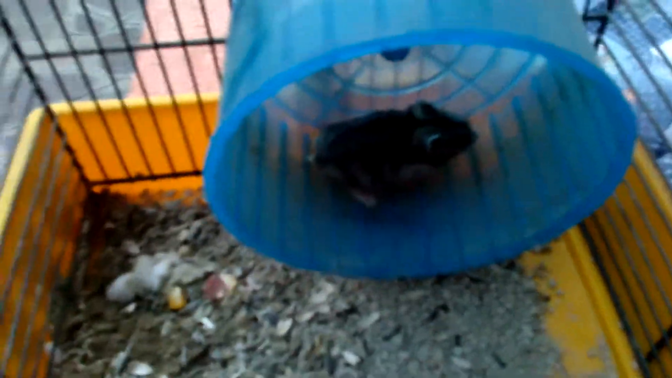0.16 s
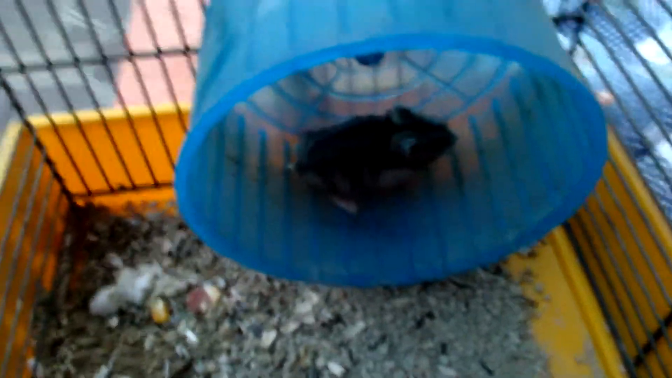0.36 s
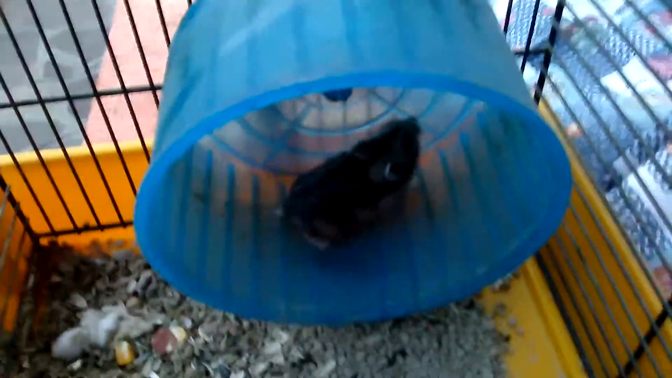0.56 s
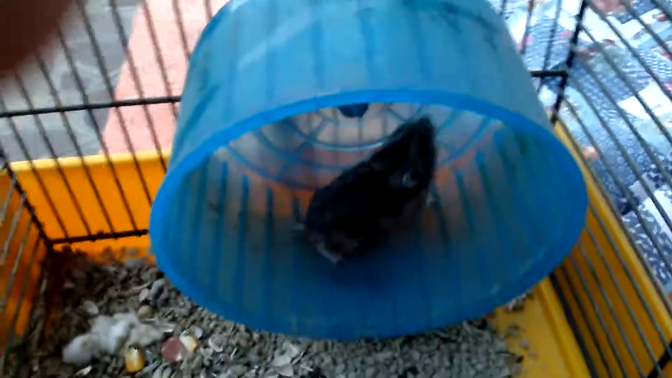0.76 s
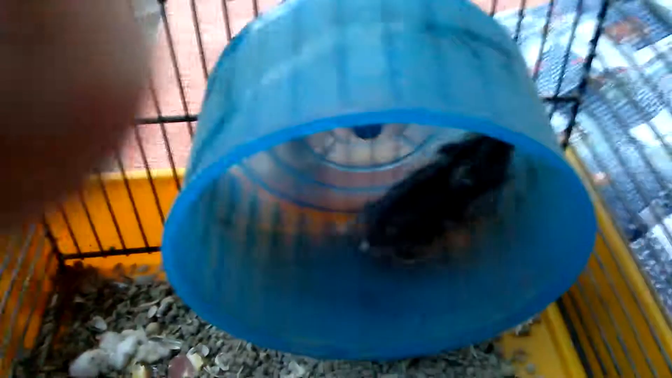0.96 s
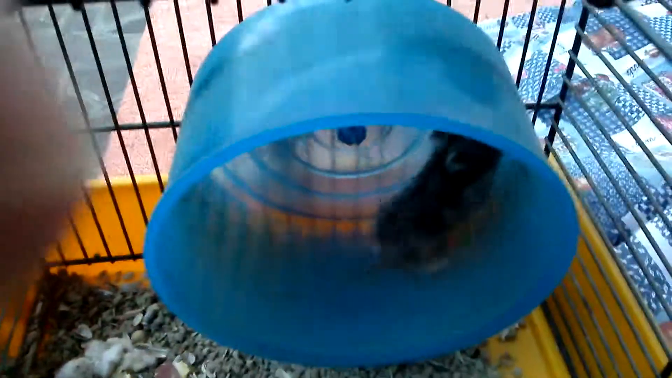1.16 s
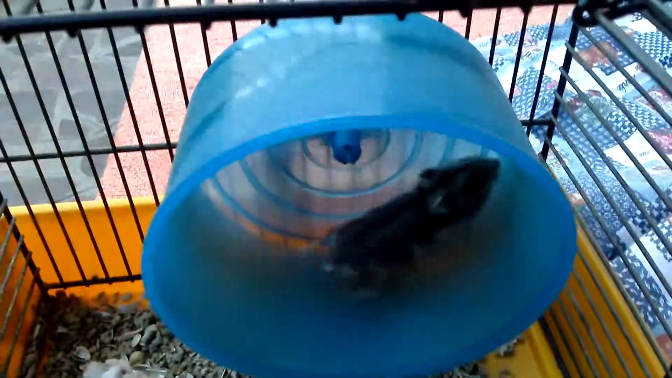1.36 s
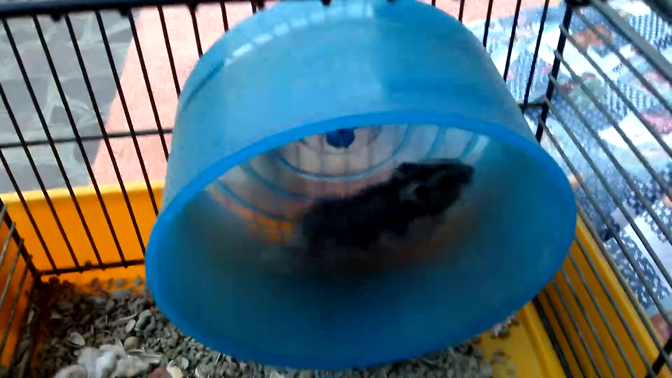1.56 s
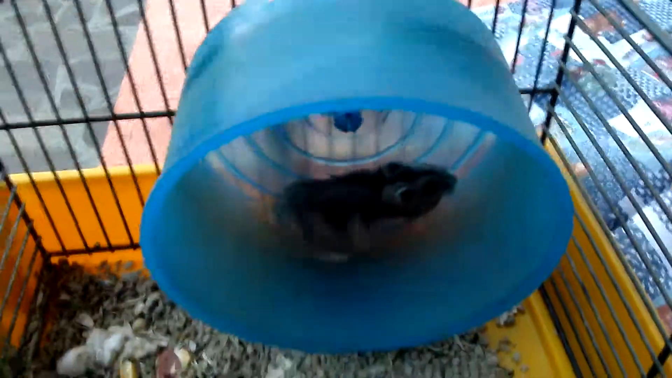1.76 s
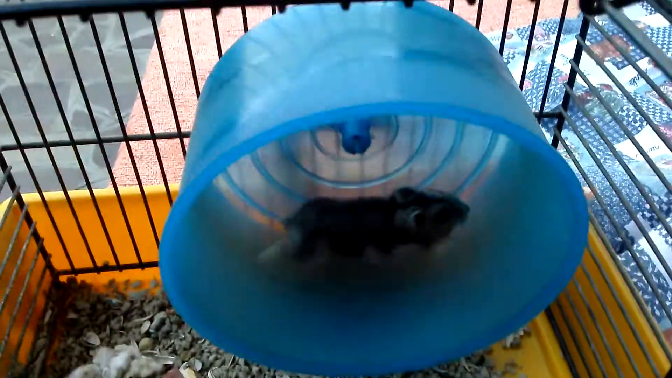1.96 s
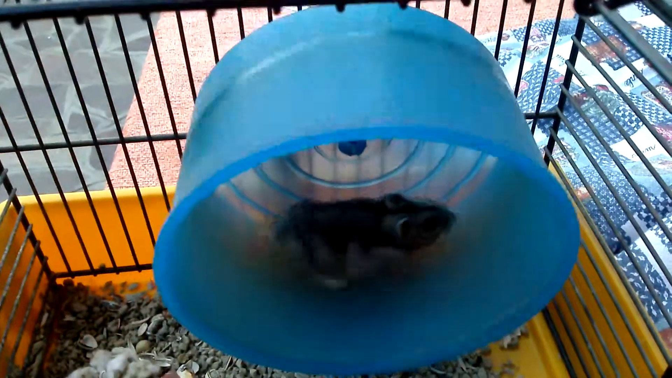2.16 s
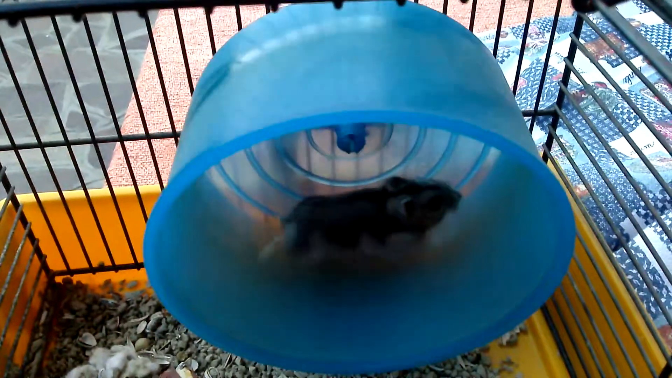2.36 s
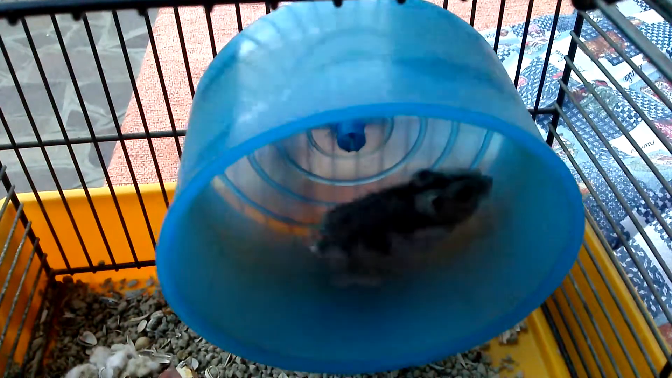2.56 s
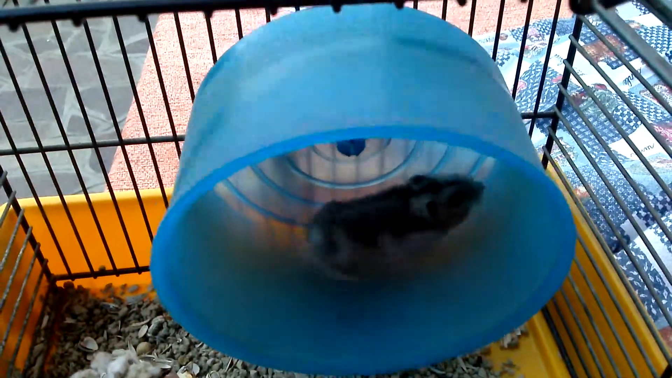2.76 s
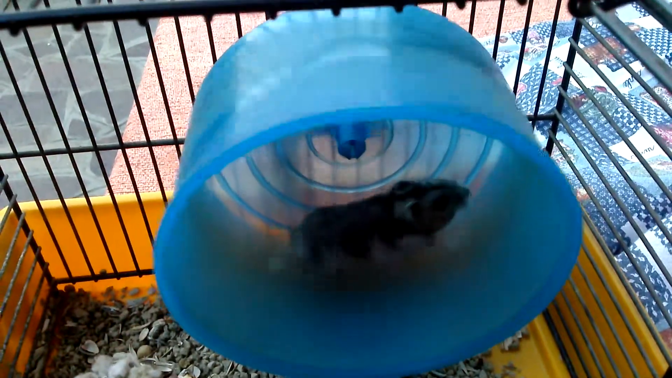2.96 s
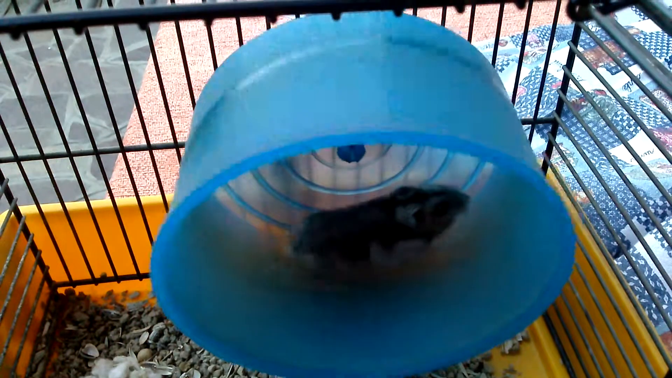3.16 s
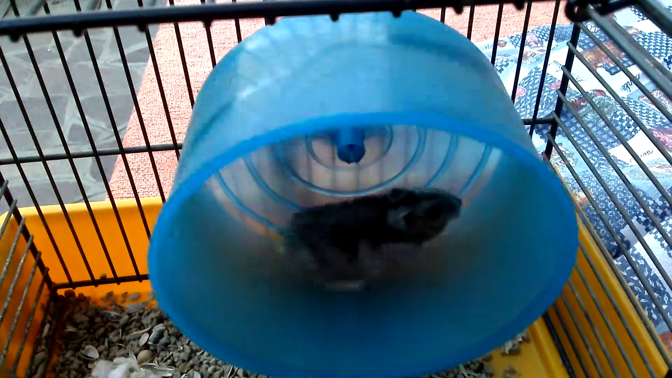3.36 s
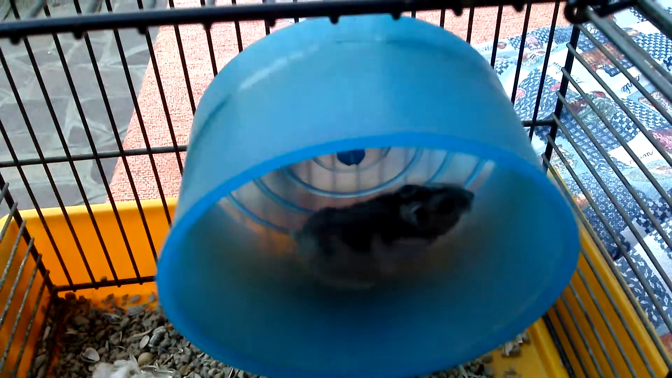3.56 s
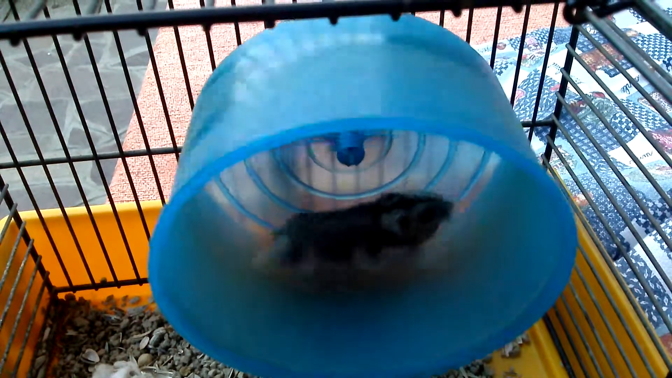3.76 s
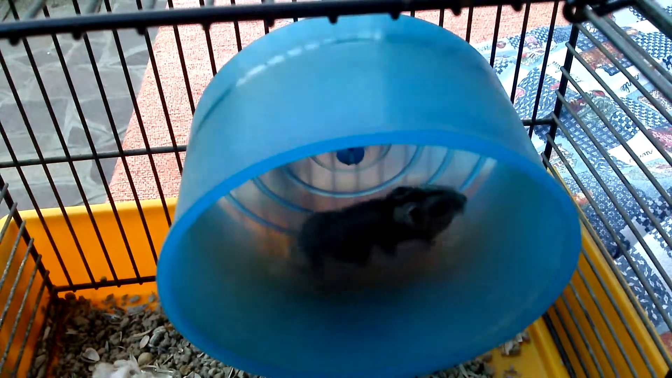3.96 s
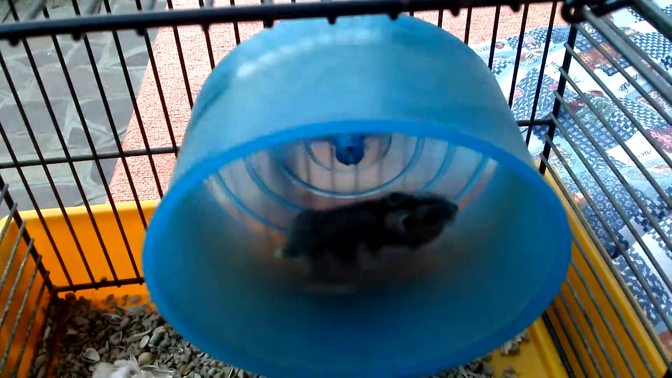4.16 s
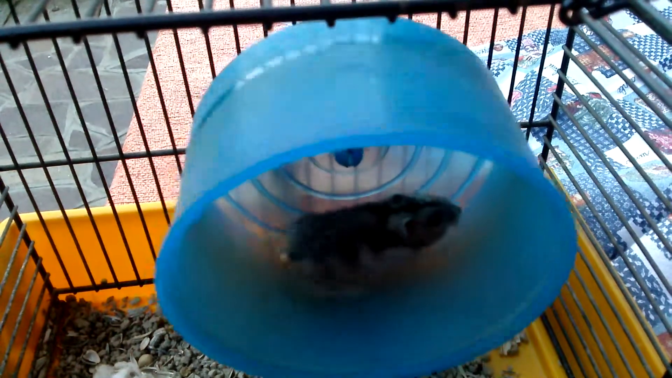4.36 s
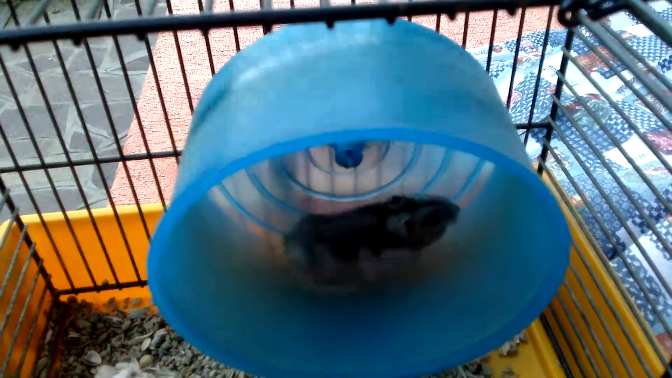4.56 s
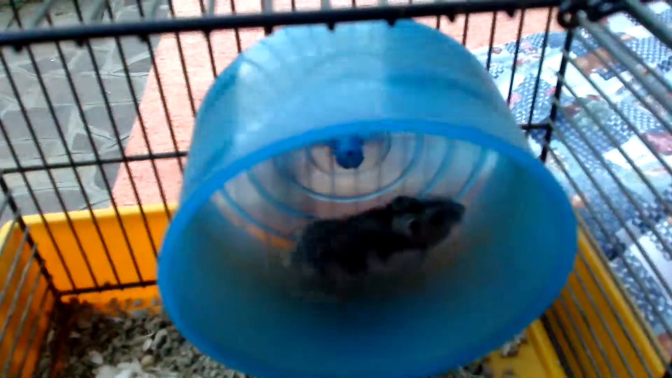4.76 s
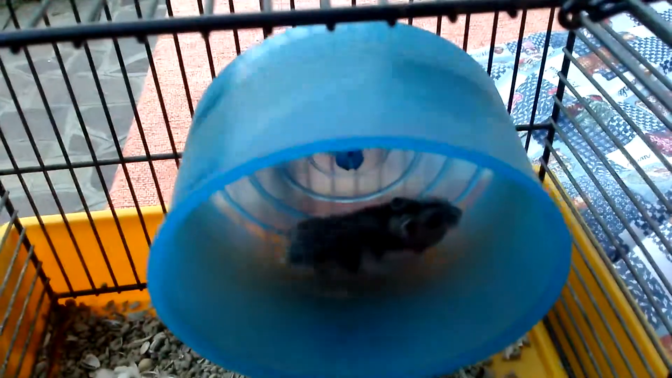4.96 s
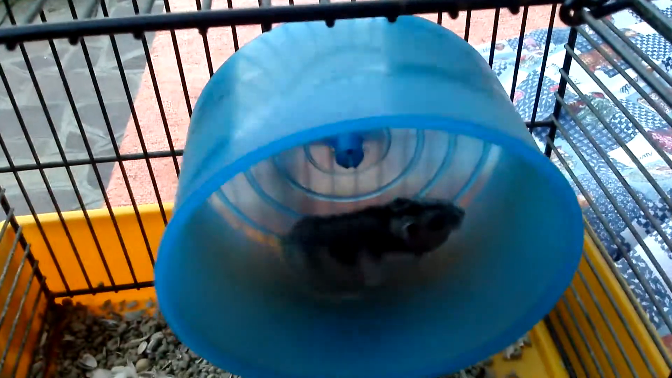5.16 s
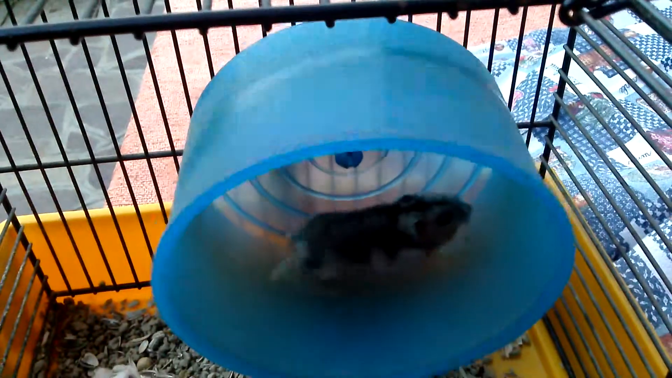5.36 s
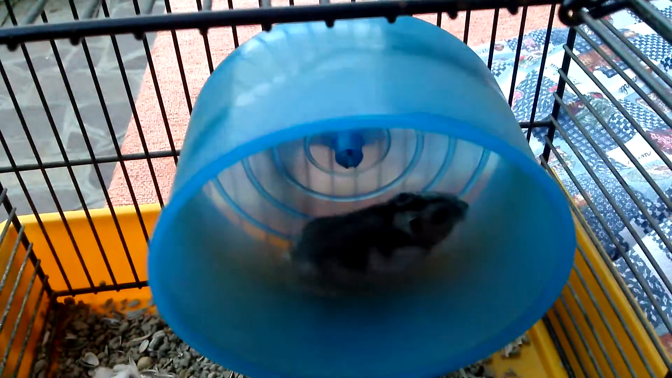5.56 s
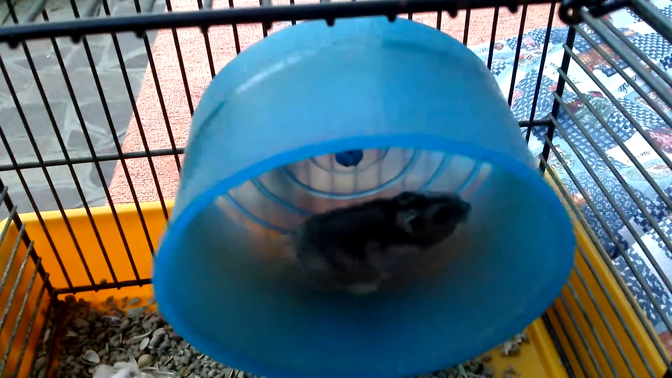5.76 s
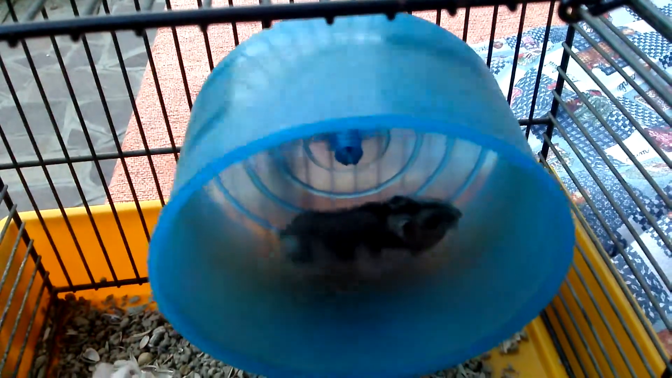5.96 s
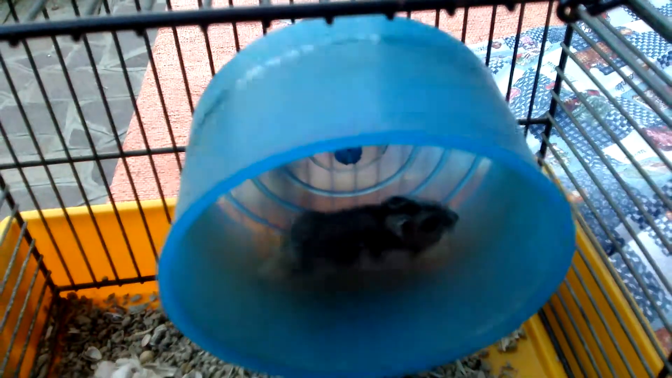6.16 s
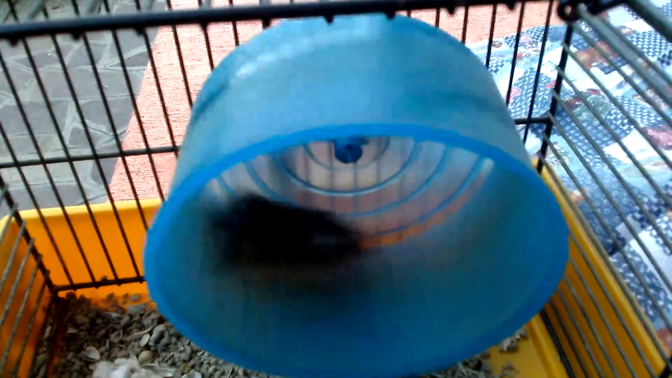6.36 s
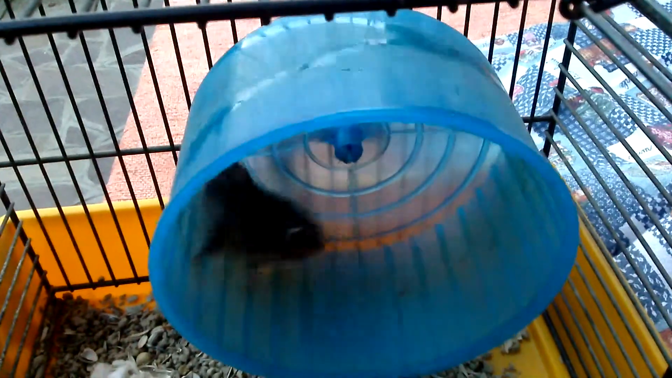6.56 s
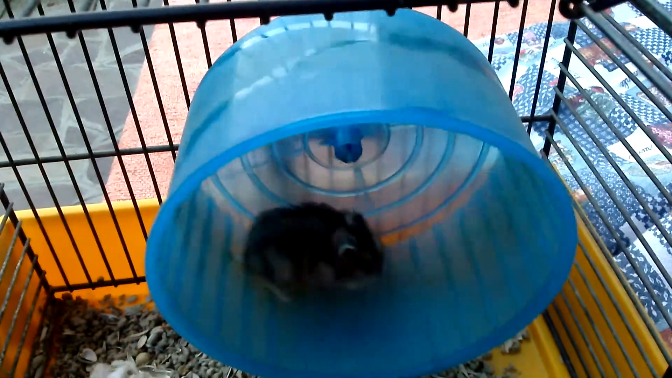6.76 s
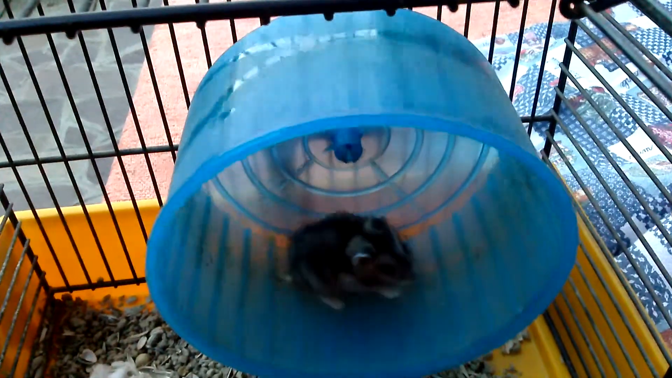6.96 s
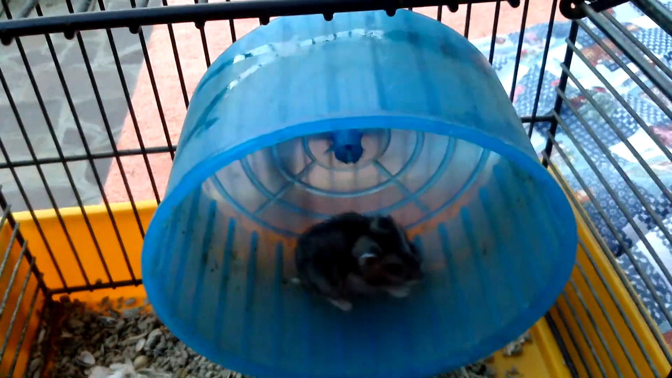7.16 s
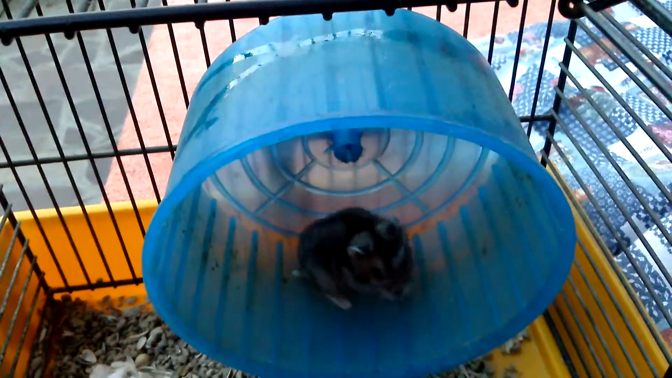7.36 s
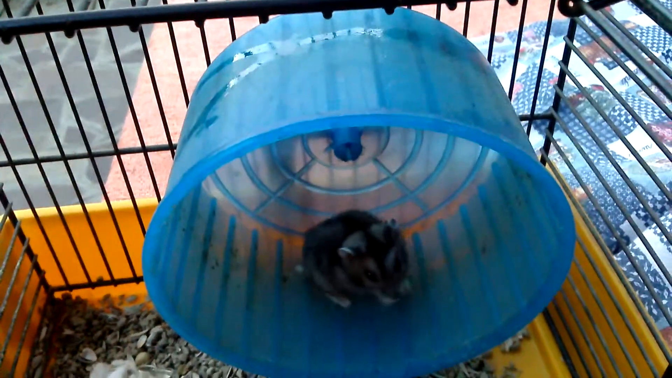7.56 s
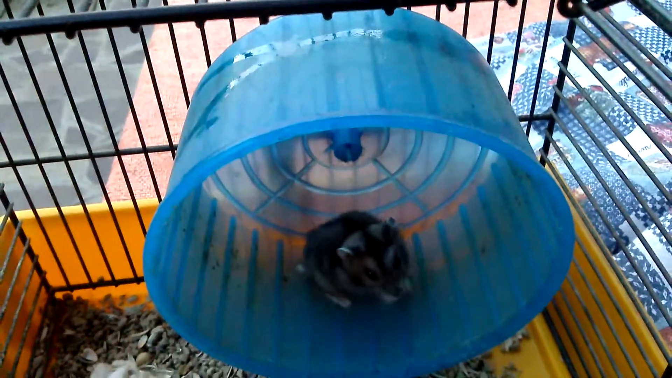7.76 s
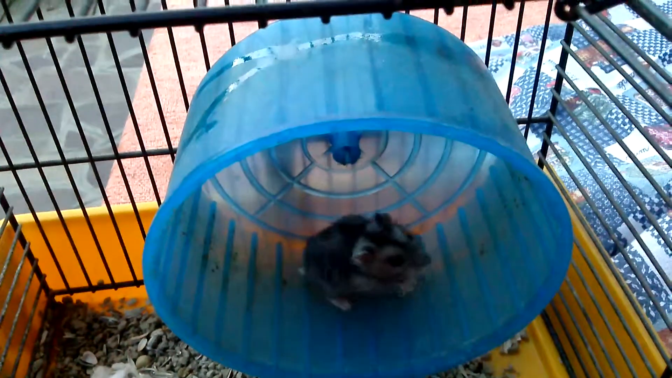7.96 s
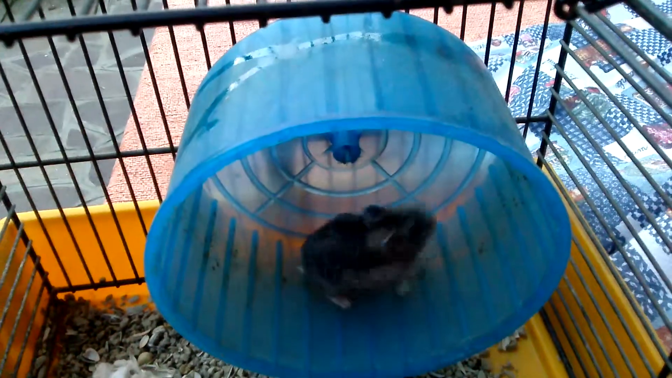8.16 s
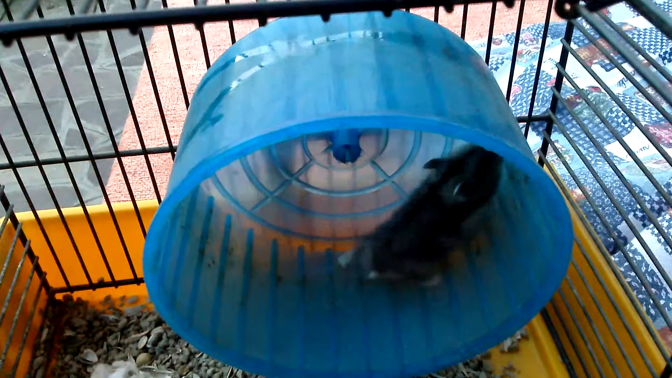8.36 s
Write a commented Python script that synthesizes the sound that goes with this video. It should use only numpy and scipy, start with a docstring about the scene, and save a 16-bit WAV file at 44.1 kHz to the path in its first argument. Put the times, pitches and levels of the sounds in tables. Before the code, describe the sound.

A quiet room with low rumble, soft hiss and a dull hum that swells and fades. From 0 to 1.5 s a finger rubs the recorder's case very close: short raspy, airy scuffs, with a sharp loud snap at 0.43 s, harsher rubbing and several ringing snaps from 0.9 to 1.0 s, and a heavy dull push near 1.15 s. Weak clicks trail off by 1.8 s. From about 1.6 s a small rodent gallops in a ribbed plastic wheel, far quieter: seven or eight scratchy strides a second, a dry whirr, light claw patter and thin axle squeaks, clearest around 5.2 s. Occasional tiny very high ticks appear. At 6.5 to 6.75 s claw taps bunch together as the wheel slows. It rests near 7 s with two soft shuffles, at 7.0 and 7.2 s. Then only faint room noise and a few very high ticks remain until 8.4 s.

```python
"""A small rodent runs in a plastic wheel in a quiet room, close to a hand-held recorder. Rumble, hiss and
swelling low tones lie under it all. First a finger rubs the recorder's case, as coloured friction noise, with
dull pushes and struck, ringing snaps. Then the wheel whirrs: each stride scrapes the ribbed drum as friction
noise through resonances, the axle squeaks and claws tick as short pings, a few with a sharp crack. After about
seven seconds the wheel comes to rest, with two soft shuffles and a few last very high ticks."""
import sys
import numpy as np
from scipy import signal
from scipy.fft import rfft, irfft
from scipy.io import wavfile
from scipy.ndimage import uniform_filter1d

SR = 44100
rng = np.random.default_rng(int(sys.argv[2]) if len(sys.argv) > 2 else 0)


def magnitude_from_level(level_db):
    """Linear magnitude for a level in decibels (20 dB per decade)."""
    exponent = np.asarray(level_db, float) / 20
    return 10 ** exponent


def materialize(psi):
    """Save the field psi as 16-bit PCM at rate SR to the path in sys.argv[1].

    A 1-D psi becomes a single channel; in a 2-D psi each row is a channel.
    """
    bounded = np.clip(np.atleast_2d(psi).T, -1, 1)
    quanta = np.round(bounded * 32767).astype(np.int16)
    wavfile.write(sys.argv[1], SR, quanta)


N = 370881  # length in samples


def read(points, hz):
    """Spectrum value on a log-frequency axis."""
    f, value = np.transpose(points)
    return np.interp(np.log(hz + 1), np.log(f + 1), value)


def evened(x):
    """Scales to rms 1."""
    return x / np.sqrt(np.mean(x ** 2) + 1e-20)


def colour(x, points):
    """Filters by a spectrum in dB, result at rms 1."""
    gain = magnitude_from_level(read(points, np.fft.rfftfreq(len(x), 1 / SR)))
    return evened(irfft(rfft(x) * gain, len(x)))


def resonate(x, hz, width):
    """Shifts hz down to zero, smooths, shifts back: a resonance of gain 1."""
    turn = np.exp(2j * np.pi * np.cumsum(hz * np.ones(len(x))) / SR)
    r = np.exp(-np.pi * width / SR)
    return 2 * (turn * signal.lfilter([1 - r], [1, -r], x / turn)).real


def fuzz(hz, width):
    """Noise through the same resonance twice: a blurred tone at rms 1."""
    once = resonate(rng.standard_normal(N), hz, width)
    return evened(resonate(once, hz, width))


def wander(per_s):
    """Slow chance, rms 1: straight lines between per_s random values a second, lightly smoothed."""
    steps = rng.standard_normal(round(per_s * N / SR) + 2)
    line = np.interp(np.linspace(0, len(steps) - 1, N), np.arange(len(steps)), steps)
    return evened(uniform_filter1d(line, size=100))


def grit(per_s, spread_db):
    """Friction: a dense train of tiny slips of uneven size."""
    slips = (rng.random(N) < per_s / SR) * rng.standard_normal(N)
    return slips * magnitude_from_level(spread_db * np.minimum(rng.exponential(1, N), 4))


def ping(hz, t60, phase=0.):
    """A mode struck once, falling 60 dB in t60 seconds."""
    t = np.arange(1200) / SR
    return np.sin(2 * np.pi * hz * t + phase) * magnitude_from_level(-60 * t / t60)


def curve(rows, column, off=-120.):
    """One column of a table along the whole time axis, at off outside the table."""
    rows = np.array(rows)
    return np.interp(np.arange(N) / SR, rows[:, 0], rows[:, column], off, off)


def add(mix, s, sound):
    """Mixes a short sound in at time s."""
    part = mix[round(s * SR):][:len(sound)]
    part += sound[:len(part)]


# Colour of room rumble and microphone hiss. Each row: frequency in Hz, relative level in dB.
ROOM_COLOUR = [(15, -61), (28, -0.5), (60, 3), (125, -5.5), (165, -14), (200, -15.5), (350, -18.5),
               (900, -27), (1400, -30.5), (2400, -38), (5000, -39.5), (9000, -39), (14700, -36),
               (16500, -33)]
# Low tones that swell and fade. Each row: time in seconds, drone level in dB, moan level in dB.
LOW_SWELLS = [(0, -55, -61), (.25, -56, -56), (1.5, -60, -78), (2.2, -50.5, -66.5), (2.8, -60, -66),
              (3.6, -51, -67), (4.2, -60.5, -65), (4.8, -48.5, -59.5), (5.7, -53, -61.5), (6.3, -52, -55),
              (6.9, -60.5, -76), (7.3, -90, -104), (8.41, -69.5, -78)]
ROOM_DB = -45  # rms of rumble and hiss together


def room():
    """Steady hiss and rumble as shaped noise, with a drone and a faint moan of blurred tones that come and go."""
    base = magnitude_from_level(ROOM_DB) * colour(rng.standard_normal(N), ROOM_COLOUR)
    drone = magnitude_from_level(curve(LOW_SWELLS, 1)) * fuzz(139.3, 18.2)
    moan = magnitude_from_level(curve(LOW_SWELLS, 2)) * fuzz(350, 130)
    return base + drone + moan


# Rubs of the finger on the case. Each row: start in seconds, length in seconds, rasp level at the start in dB,
# rasp level at the end in dB, airy hiss in dB relative to the rasp.
RUBS = [(0, 0.055, -52, -58, -33), (0.047, 0.046, -52, -43, -51), (0.108, 0.053, -70, -65, 7.5),
        (0.156, 0.037, -46, -48.5, -12), (0.198, 0.12, -45.5, -55.5, -18), (0.32, 0.14, -60, -46, -15),
        (0.477, 0.057, -48, -60, 0), (0.547, 0.1, -60.5, -44.5, -0.5), (.645, 0.15, -42, -45, 4.5),
        (0.765, 0.14, -44.5, -43.5, 10.5), (0.872, 0.082, -38.5, -27, -14.5), (0.969, 0.072, -29, -34, -3),
        (1.049, 0.01, -36, -43, -10), (1.074, .062, -37, -35.5, 1.5), (1.132, 0.024, -31.5, -21, -3),
        (1.154, 0.059, -28.5, -29, -6.5), (1.231, 0.077, -38, -37.5, -11.5),
        (1.318, 0.033, -38, -32.5, -7.5), (1.352, 0.059, -30.5, -41, -13), (1.441, 0.052, -45, -45.5, -11)]
RUB_ATTACK_S, RUB_RELEASE_S = 0.0097, 0.018  # the release is the time for a fall of 10 dB
RUB_FLOOR_DB = -60.5  # light contact remains between rubs


def rubbing():
    """Rasp and airy hiss levels in dB: each rub starts fast, drifts in level and lets go."""
    rasp, airy = np.zeros(N), np.zeros(N)  # powers
    for s, length, start_db, end_db, airy_db in RUBS:
        t = np.arange(0, length + 8 * RUB_RELEASE_S, 1 / SR)
        drift = magnitude_from_level(2 * np.interp(t, [0, length], [start_db, end_db]))
        attack = np.minimum(t / RUB_ATTACK_S, 1) ** 2
        release = magnitude_from_level(-20 * np.maximum(t - length, 0) / RUB_RELEASE_S)
        power = drift * attack * release
        add(rasp, s, power)
        add(airy, s, power * magnitude_from_level(2 * airy_db))
    held = np.arange(N) / SR < GRIP[-1][0]
    rasp = rasp + held * magnitude_from_level(2 * RUB_FLOOR_DB)
    return 10 * np.log10(rasp + 1e-12), 10 * np.log10(airy + 1e-12)


# Rasp colour of the case. Each row: frequency in Hz, relative level in dB.
CASE_COLOUR = [(880, -17), (1500, -10), (2340, 3.5), (3950, 0), (4900, -1), (5440, -29), (6000, -43),
               (7800, -54), (13200, -120)]
# Airy hiss of skin. Each row: frequency in Hz, relative level in dB.
AIRY_COLOUR = [(7000, -18.5), (9200, -0.5), (11000, 3), (13000, 5), (15700, 1.5), (16200, -70)]
# The grip. Each row: time in seconds, centre of the contact resonance in Hz,
# low knock in dB before its share of the rasp level is added.
GRIP = [(0, 2390, -30), (.2, 2400, -25.5), (.45, 2740, -25.5), (.7, 3340, -43), (.9, 3050, -50),
        (1.03, 4000, -40), (1.1, 2920, -54), (1.3, 3530, -47), (1.52, 2850, -37)]
# A thin whistle while the grip shifts. Each row: time in seconds, middle level in dB.
WHISTLE = [(0, -65), (.1, -66), (.14, -72), (.21, -62), (.33, -66), (.56, -65)]
FINE_DB, FINE_SHARE = -7, 0.27  # the fine hiss lies between rasp and airy hiss; offset, then share of the airy
KNOCK_SHARE = 0.5  # the low knock follows the rasp only in part


def finger():
    """Skin slips excite the case; the contact resonance moves with the finger."""
    slips = grit(25000, 0.54)
    body = colour(slips, CASE_COLOUR)
    contact_hz = curve(GRIP, 1, GRIP[-1][1]) * (1 + 0.12 * wander(58.8))
    catch = magnitude_from_level(1.8 * wander(300))  # the skin catches and lets go
    rasp = evened(catch * (body + 2.5 * resonate(body, contact_hz, 1000)))
    knock = colour(slips, [(250, -8.0), (500, -5), (1000, -3.5), (1700, -0.5), (2300, -30.0)])
    fine = colour(slips, [(4500, -5.5), (5600, 4), (7000, -0.5), (9000, -2), (10500, -11.5)])
    airy = colour(slips, AIRY_COLOUR)
    rasp_db, airy_db = rubbing()
    knock_db = curve(GRIP, 2) + KNOCK_SHARE * rasp_db
    fine_db = FINE_DB + (1 - FINE_SHARE) * rasp_db + FINE_SHARE * airy_db
    whistle = magnitude_from_level(curve(WHISTLE, 1) + 2.5 * wander(42)) * fuzz(6770, 200)
    return magnitude_from_level(rasp_db) * rasp + magnitude_from_level(knock_db) * knock + magnitude_from_level(fine_db) * fine + magnitude_from_level(airy_db) * airy + whistle


# Dull pushes on the case. Each row: start in seconds, level in dB, time constant in seconds.
PUSHES = [(0.212, -27.5, 0.0027), (0.239, -27, 0.0028), (0.888, -36, 0.0017), (0.973, -35, 0.0021),
          (1.08, -65, 0.0034), (1.155, -13, 0.0027)]


def pushes():
    """Dull pushes on the capsule: the pressure dips, then swings back."""
    out = np.zeros(N)
    for s, db, length in PUSHES:
        u = np.arange(4000) / SR / length
        add(out, s, -magnitude_from_level(db) * np.e * u * np.exp(-u) * np.cos(1.48 * u))
    return out


# Snaps and sharp ticks. Each row: start in seconds, level in dB, ring in Hz, # treble crack in dB relative to
# the ring. Up to 1.45 s the finger or case snaps; the later rows are broad ticks that fall together with claw
# ticks.
SNAPS = [(.4155, -47, 4850, 4.5), (0.4302, -7, 2730, -1), (0.4348, -23, 3300, -38.5),
         (0.9066, -16, 2900, 2), (.9066, -11, 1470, -24), (0.9388, -13, 2330, -13),
         (1.0055, -16, 4400, -12), (1.449, -31, 2980, -5), (1.554, -35.5, 3170, -3.5),
         (1.649, -38, 5750, -3), (1.834, -48.5, 6000, 16), (2.896, -45, 5240, 6)]
# Modes of a snap. Each row: multiple of the ring frequency, level in dB, 60 dB decay time in seconds.
SNAP_MODES = [(1, 0, .0045), (1.75, 0, .003), (2.6, -9, .002)]


def snaps():
    """Short rings, each a few struck modes with a treble crack."""
    out = np.zeros(N)
    for s, db, hz, crack_db in SNAPS:
        ring = sum(magnitude_from_level(d) * ping(k * hz, t60) for k, d, t60 in SNAP_MODES)
        crack = ping(13600, .0022) + .6 * ping(10900, .0022, 1.5)
        add(out, s, magnitude_from_level(db) * (ring + magnitude_from_level(crack_db) * crack))
    no_bass = signal.butter(2, 1300, "high", fs=SR, output="sos")  # a small part radiates no bass
    return signal.sosfilt(no_bass, out)


# The gallop. Each row: time in seconds, strides so far.
PACE = [(1.56, 0), (1.9, 3), (2.16, 5), (2.572, 8), (2.79, 10), (3.052, 12), (3.293, 14), (3.5, 16),
        (4.274, 23), (4.405, 24), (4.745, 27), (4.88, 28), (5.105, 30), (5.583, 34), (5.91, 37),
        (6.262, 40), (6.37, 41), (6.525, 42), (6.645, 43), (6.795, 44), (6.947, 45)]
# Its effort. Each row: time in seconds, scrape level in dB, axle squeak level in dB.
EFFORT = [(1.56, -61, -62), (1.9, -60.5, -67), (2.16, -69, -72), (2.699, -64, -65), (3.2, -57.5, -68),
          (3.5, -60.5, -65), (4.2, -58.5, -63), (4.55, -59.5, -66), (4.75, -60, -61), (4.9, -60, -69),
          (5.23, -60.5, -57), (5.35, -62, -63), (5.46, -59, -59.5), (5.7, -59.5, -71), (6.0, -59.5, -65),
          (6.37, -61.5, -62), (6.525, -64, -64), (6.645, -68, -84), (6.8, -70, -60), (6.95, -75, -67.5)]


def strides():
    """One row per stride: start s, duration s, scrape dB, squeak dB."""
    s, count = np.transpose(PACE)
    start = np.interp(np.arange(46), count, s)
    s, scrape_db, squeak_db = np.transpose(EFFORT)
    return np.transpose([start, np.gradient(start), np.interp(start, s, scrape_db), np.interp(start, s, squeak_db)])


# Steady whirr of the turning wheel. Each row: time in seconds, level in dB.
SPIN = [(1.4, -59.5), (2.3, -64), (3.4, -62.5), (6.4, -64.5), (6.75, -72), (7.1, -72), (7.5, -77)]
# Rustle of the ribs. Each row: frequency in Hz, relative level in dB.
RIBS_COLOUR = [(1500, -15), (2200, -1.5), (2900, 0.5), (3700, 3), (4100, 2), (4500, 1), (4900, -5),
               (5400, -4), (6500, -16)]
# What the drum rings with. Each row: middle frequency in Hz, width of each of two passes in Hz,
# middle level in dB relative to the rustle.
DRUM_MODES = [(702, 126, -6), (966, 190, -3.5)]
# The axle's squeaky ring, a single row: frequency in Hz, width of each of two passes in Hz.
AXLE = (1782, 142)
DRAG, DRAG_SPREAD = .52, .08  # share of a stride in which the paws drag; 15 ms are added to it
SCRAPE_SPREAD_DB, SQUEAK_SPREAD_DB = 1.2, 1.2  # from stride to stride


def wheel():
    """Paws drag over the ribs once a stride, over the steady whirr; the load makes the axle squeak."""
    force = magnitude_from_level(curve(SPIN, 1)) ** 2  # force and load are powers
    load = force * magnitude_from_level(-16.5)  # 8.25 dB below the whirr
    chance = rng.standard_normal((46, 3))
    for (s, period, db, squeak_db), (a, b, c) in zip(strides(), chance):
        drag_s = period * np.clip(DRAG + DRAG_SPREAD * a, .2, .9) + 0.015
        shape = signal.windows.tukey(round(drag_s * SR), .6)
        add(force, s - .01, magnitude_from_level(2 * (db + SCRAPE_SPREAD_DB * b)) * shape)
        add(load, s - .005, magnitude_from_level(2 * (squeak_db + SQUEAK_SPREAD_DB * c)) * shape ** 2)
    slips = grit(7000, 1.45)
    drum = colour(slips, RIBS_COLOUR)
    for hz, width, db in DRUM_MODES:
        hz = hz * (1 + .05 * wander(9))  # another patch of the drum comes round
        ring = evened(resonate(resonate(slips, hz, width), hz, width))
        drum = drum + magnitude_from_level(db + 0.59 * wander(18)) * ring
    squeak = magnitude_from_level(0.97 * wander(40)) * fuzz(*AXLE)
    return np.sqrt(force) * drum + np.sqrt(load) * squeak


# Places in the stride where front and hind paws land: two shares of a stride.
LANDINGS = (0, .55)
LANDING_DB, LANDING_SPREAD_DB = 10.5, 2.5  # level over the scrape, largest departure either way
STRAY_PER_S, STRAY_DB = 35, 8  # stray claw ticks while the wheel turns: rate, highest level over the scrape


def patter():
    """The softer footfalls: two landings a stride and stray ticks, as (s, dB, ring Hz)."""
    rows = strides()
    chance = rng.random((46, 2, 3))
    s = rows[:, :1] + rows[:, 1:2] * (np.array(LANDINGS) + 0.13 * (chance[..., 0] - .5))
    db = rows[:, 2:3] + LANDING_DB - 2 * LANDING_SPREAD_DB * (chance[..., 1] - .5)
    run_s = rows[-1, 0] - rows[0, 0]
    count = round(min(STRAY_PER_S * run_s, 200))
    when, size, stray_patch = rng.random((200, 3))[:count].T
    when = rows[0, 0] + when * run_s
    stray_db = np.interp(when, rows[:, 0], rows[:, 2]) + STRAY_DB - 8 * size
    hz = 2300 + 2200 * np.r_[chance[..., 2].ravel(), stray_patch]
    return np.transpose([np.r_[s.ravel(), when], np.r_[db.ravel(), stray_db], hz])


# The loudest claws on the plastic. Each row: start in seconds, level in dB, ring in Hz.
CLAWS = [(1.621, -42.5, 3400), (1.648, -46, 3530), (1.8826, -44, 2470), (2.201, -41, 2200),
         (2.2164, -39, 4300), (2.262, -41.5, 3870), (2.6449, -41.5, 2860), (2.8955, -40, 2520),
         (3.0165, -45, 3820), (3.1258, -40.5, 2640), (3.2959, -43, 3920), (3.4017, -49, 4260),
         (3.4645, -45.5, 3960), (3.481, -45, 3630), (3.5723, -39.5, 3160), (3.622, -42, 2930),
         (3.68, -37.5, 2620), (3.7289, -40, 4220), (3.7927, -46, 3780), (3.8437, -46, 4260),
         (3.9077, -43.5, 3960), (4.0133, -43.5, 3350), (4.1773, -41, 3500), (4.2368, -45, 2360),
         (4.2901, -45, 3950), (4.355, -43, 3350), (4.4722, -43, 2420), (4.59, -44, 2610),
         (4.7416, -49, 3780), (4.816, -41.5, 2770), (4.9402, -46, 2440), (4.998, -51, 3830),
         (5.1796, -45.5, 3420), (5.4535, -46, 3390), (5.5847, -42.5, 3970), (5.6401, -42.5, 2570),
         (5.7573, -42, 2840), (5.8092, -42, 3400), (5.8706, -46, 3920), (5.9225, -42, 3900),
         (5.9908, -44, 2430), (6.1, -46, 3300), (6.2642, -47, 2660), (6.5321, -41, 3720),
         (6.5852, -39.5, 3650), (6.582, -38, 5140), (6.5967, -42, 4020), (6.6024, -42, 5080),
         (6.6114, -48, 3860), (6.6533, -44, 3940), (6.6746, -38.5, 3800), (6.6992, -51, 4260),
         (6.7451, -50, 4270), (6.8947, -54, 3810)]
# Tiny very high ticks. Each row: start in seconds, level in dB, played 4 dB lower.
HIGH_TICKS = [(2.6733, -54), (2.8957, -50), (2.9611, -52), (3.0279, -52), (3.1013, -39), (4.2601, -50),
              (4.2901, -52), (4.3988, -46), (4.4402, -44), (4.4682, -45), (4.8528, -47), (6.4033, -53),
              (6.4352, -49), (6.8193, -40), (7.63, -53), (7.6988, -49), (8.1264, -50), (8.1693, -45),
              (8.1932, -50), (8.3244, -54)]
PAW_GAP_S = .025  # a loud footfall takes the place of a soft one this near


def ticks():
    """Claws of a paw land within a few ms, each ringing the plastic briefly; the very high ticks are short puffs."""
    out = np.zeros(N)
    soft = np.minimum(np.arange(1200) / 14, 1)  # a claw is not perfectly hard
    quiet = patter()
    free = abs(quiet[:, :1] - np.transpose(CLAWS)[0]).min(axis=1) > PAW_GAP_S
    falls = np.vstack([CLAWS, quiet[free]])
    for (s, db, hz), chance in zip(falls, rng.random((len(falls), 3, 2))):
        for claw, (late, patch) in enumerate(chance):
            tap = ping(hz, .007) + .8 * ping(2000 + 3000 * patch, .004) + .6 * ping(3600, .0018)
            add(out, s + .0014 * (claw + 0.46 * late), magnitude_from_level(db - 0.86 * claw) * tap * soft)
    thin, t = fuzz(15300, 1300), np.arange(1200) / SR
    for s, db in HIGH_TICKS:
        puff = thin[round(s * SR):][:1200] * soft
        add(out, s, magnitude_from_level(db - 4.0 - 60 * t / .04) * puff)
    return out


# Soft shuffles at rest. Each row: start in seconds, length in seconds, level in dB, centre in Hz.
SHUFFLES = [(6.981, 0.041, -64, 3220), (7.195, 0.055, -62, 2260)]


def shuffles():
    """Soft shuffles: short swells of noise through a broad resonance."""
    out = np.zeros(N)
    for s, length, db, hz in SHUFFLES:
        count = round(length * SR)
        add(out, s, magnitude_from_level(db) * signal.windows.tukey(count, .5) * fuzz(hz, 1100)[:count])
    return out


def scene():
    """All sources at one microphone."""
    return (room() + finger() + pushes() + snaps() + wheel() + ticks() + shuffles())[None]


def low_pass(x):
    """Removes everything above the highest recorded frequency."""
    return signal.sosfilt(signal.butter(12, 15800, fs=SR, output="sos"), x)


def record(dry):
    """The finished mix as the small recorder keeps it."""
    return low_pass(dry)


dry = scene()
out = record(dry)
materialize(out)
```